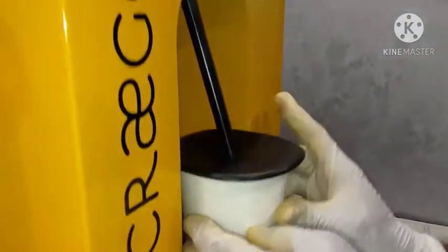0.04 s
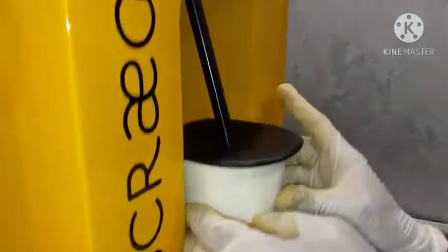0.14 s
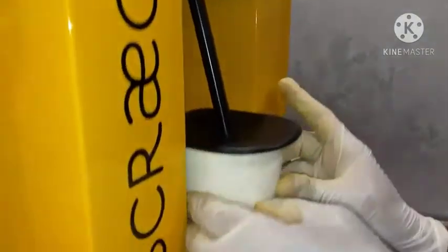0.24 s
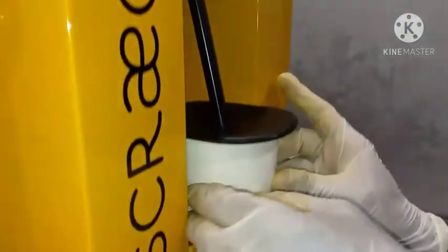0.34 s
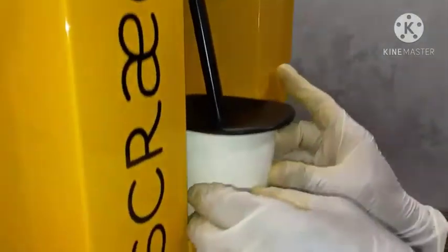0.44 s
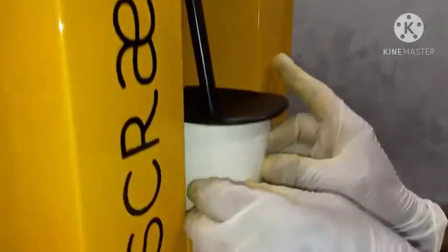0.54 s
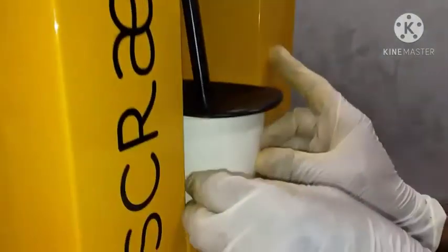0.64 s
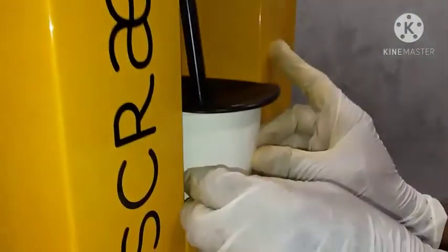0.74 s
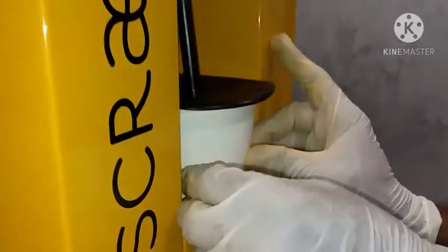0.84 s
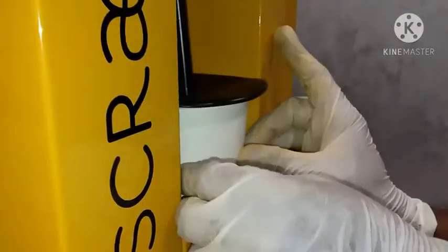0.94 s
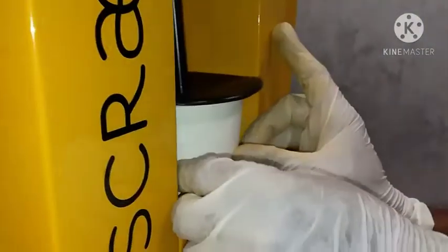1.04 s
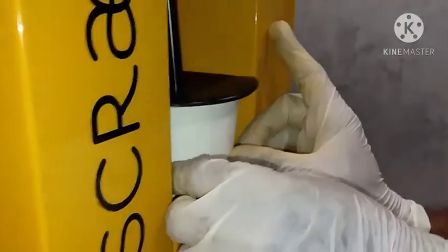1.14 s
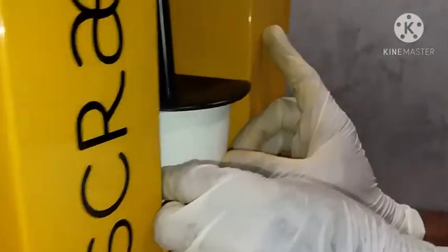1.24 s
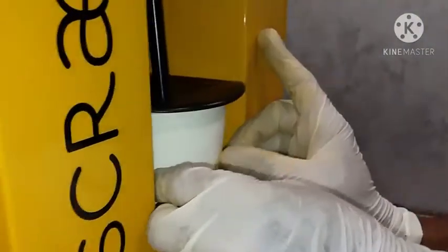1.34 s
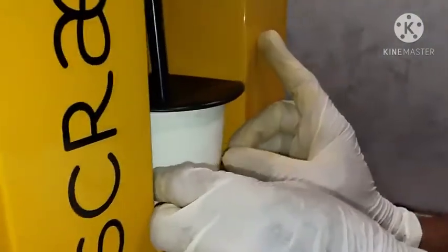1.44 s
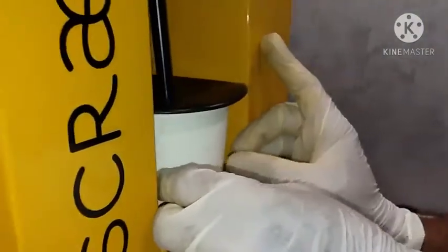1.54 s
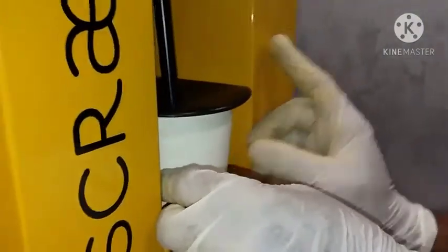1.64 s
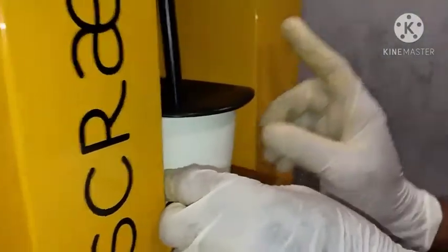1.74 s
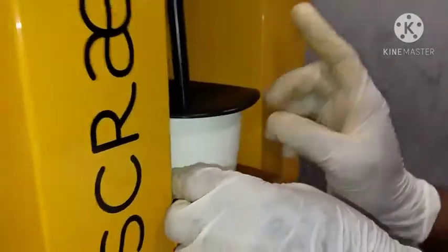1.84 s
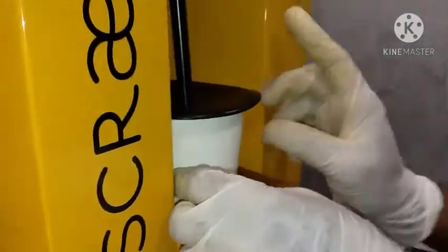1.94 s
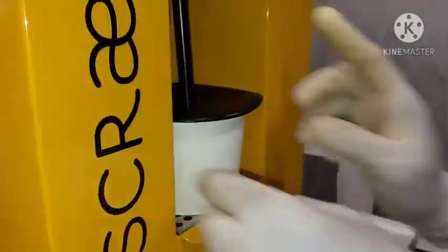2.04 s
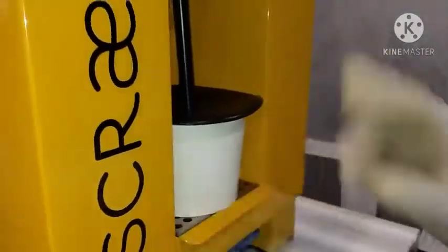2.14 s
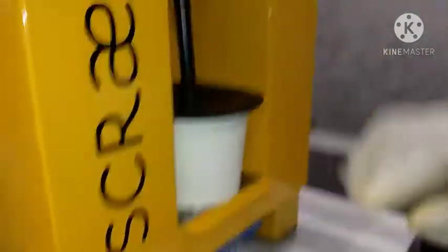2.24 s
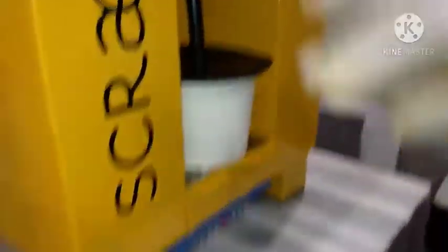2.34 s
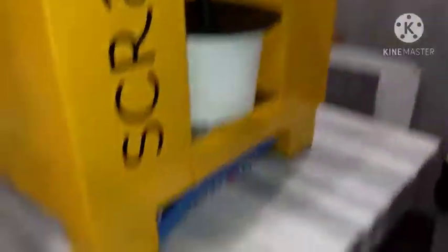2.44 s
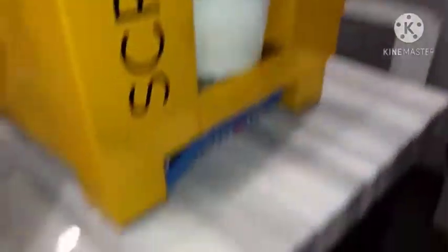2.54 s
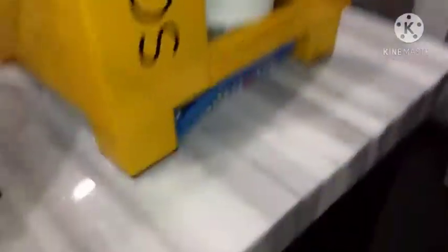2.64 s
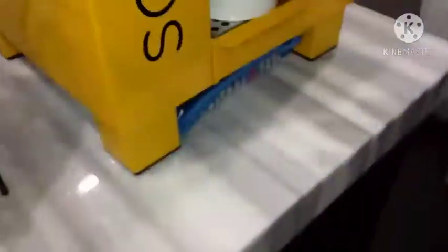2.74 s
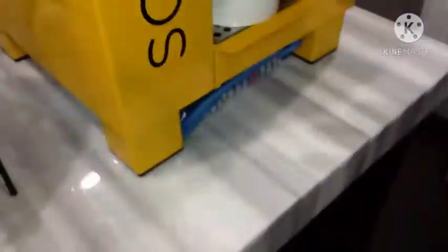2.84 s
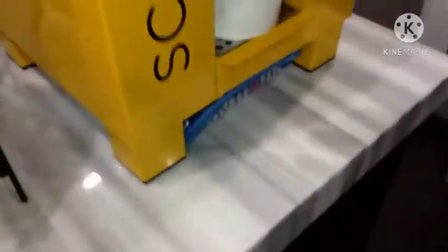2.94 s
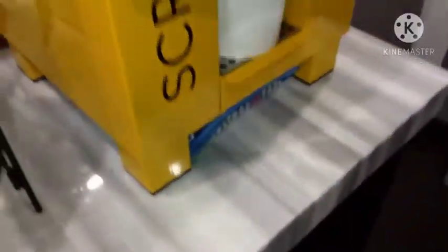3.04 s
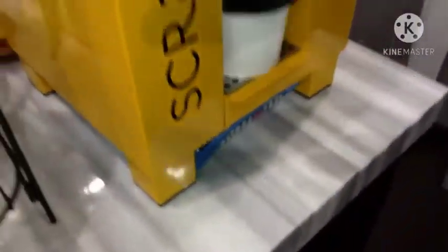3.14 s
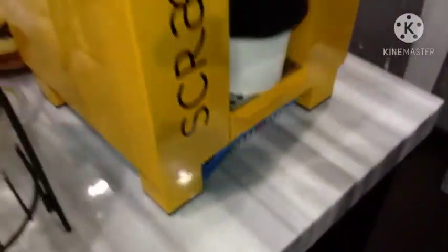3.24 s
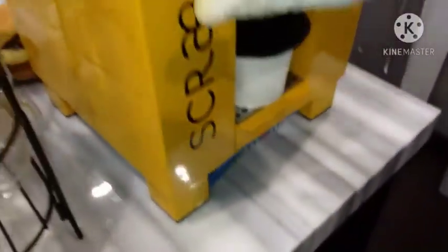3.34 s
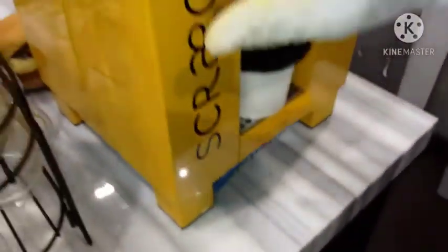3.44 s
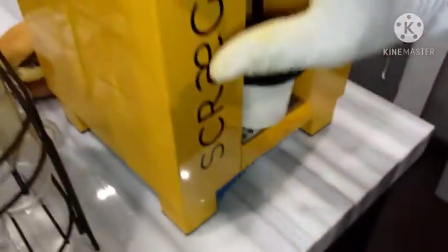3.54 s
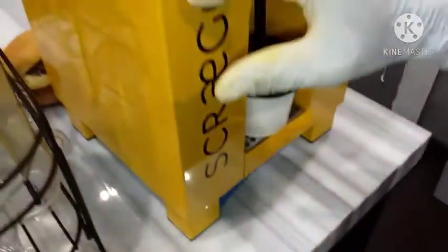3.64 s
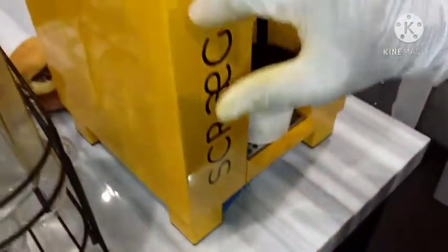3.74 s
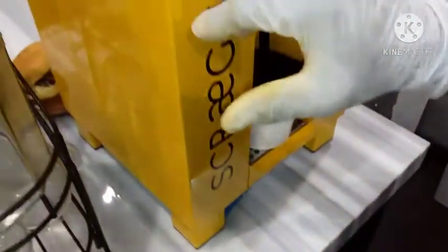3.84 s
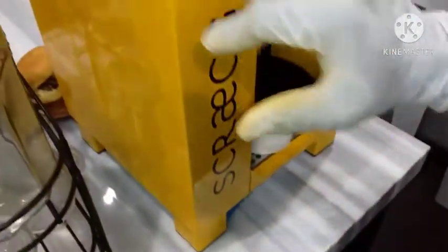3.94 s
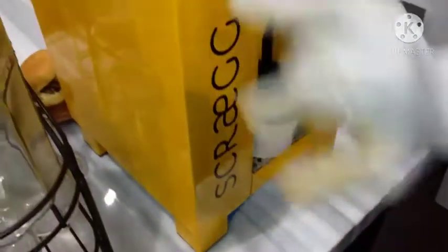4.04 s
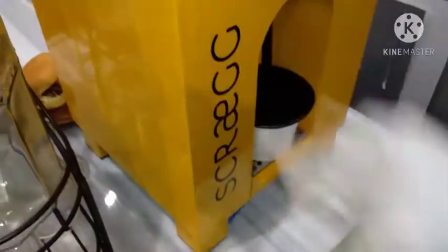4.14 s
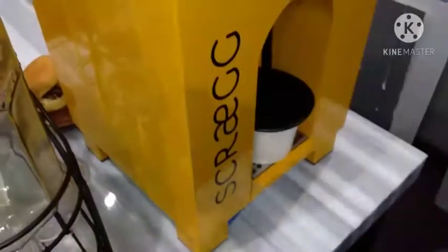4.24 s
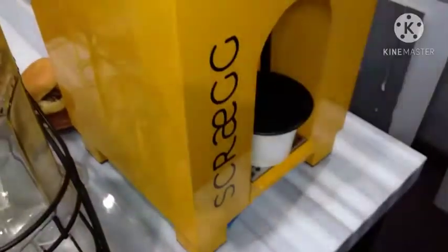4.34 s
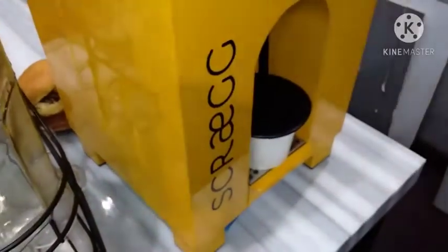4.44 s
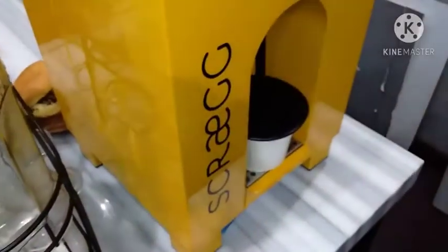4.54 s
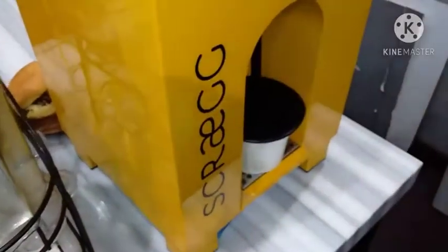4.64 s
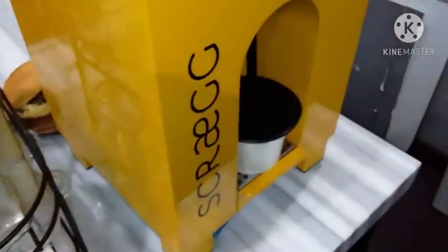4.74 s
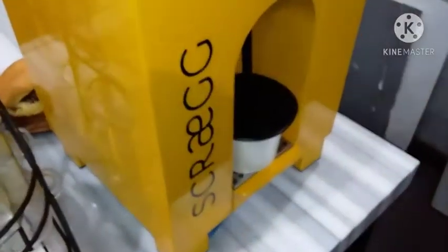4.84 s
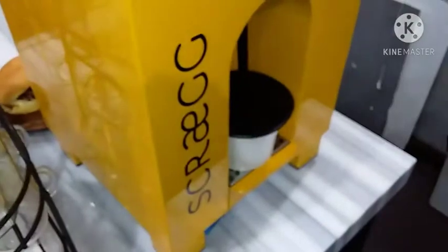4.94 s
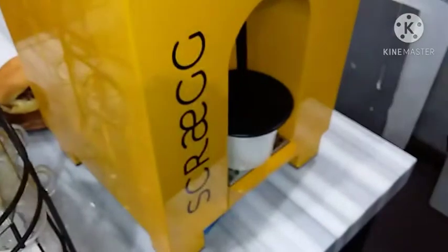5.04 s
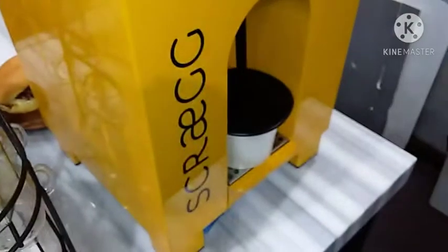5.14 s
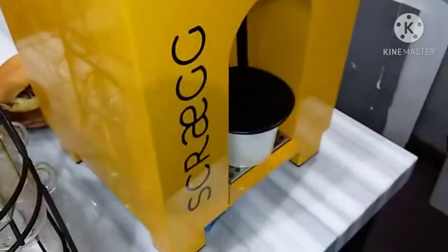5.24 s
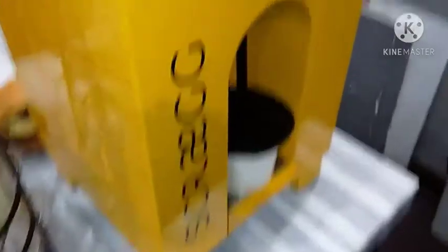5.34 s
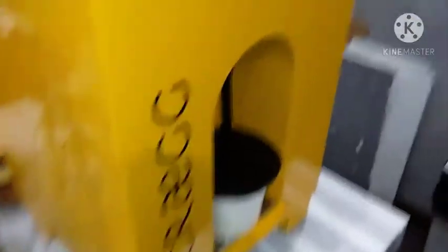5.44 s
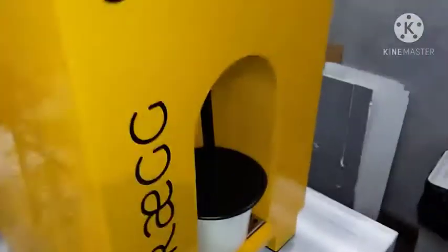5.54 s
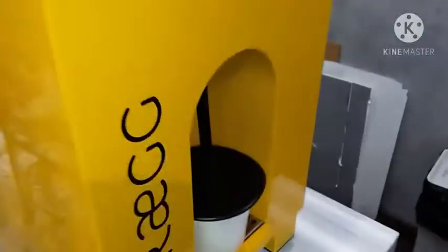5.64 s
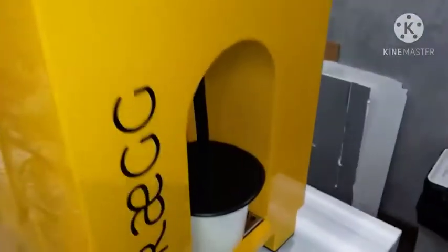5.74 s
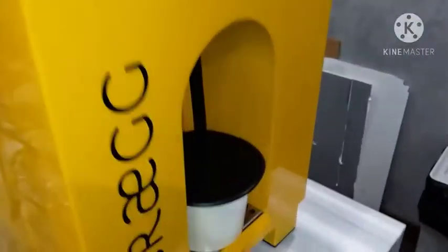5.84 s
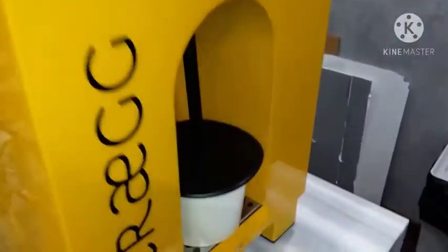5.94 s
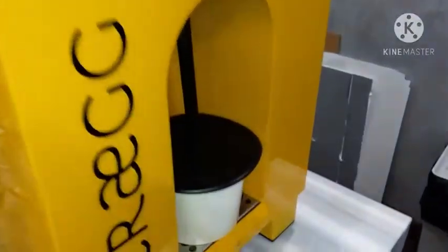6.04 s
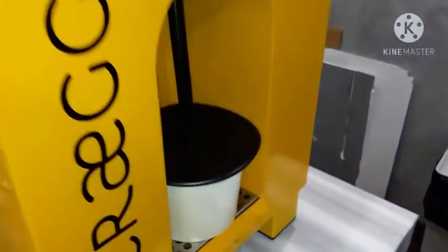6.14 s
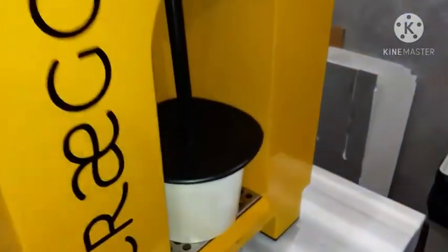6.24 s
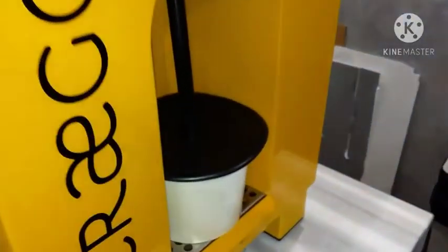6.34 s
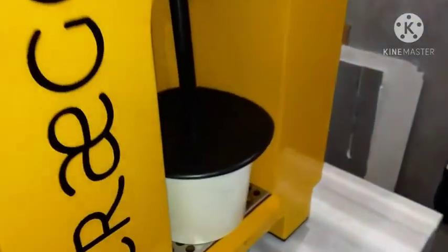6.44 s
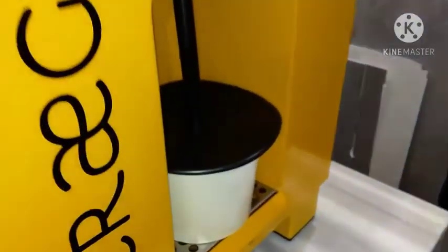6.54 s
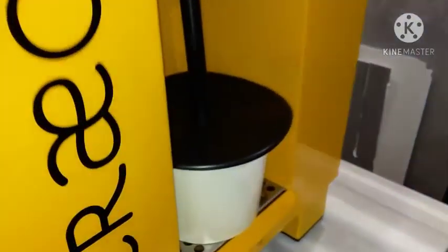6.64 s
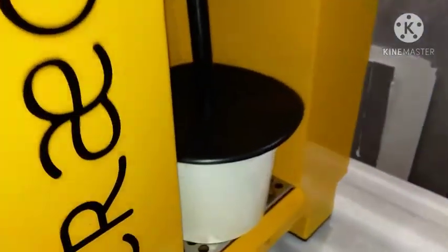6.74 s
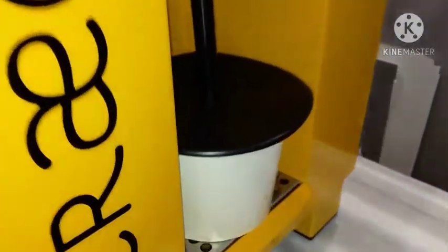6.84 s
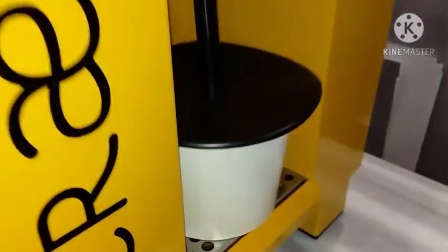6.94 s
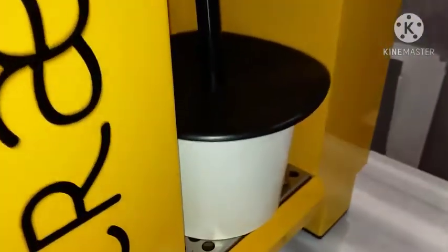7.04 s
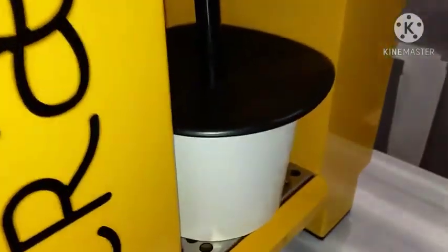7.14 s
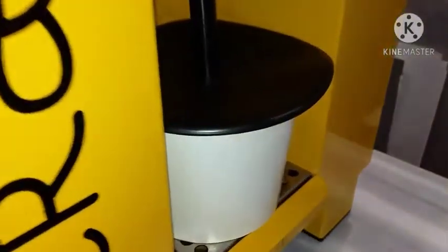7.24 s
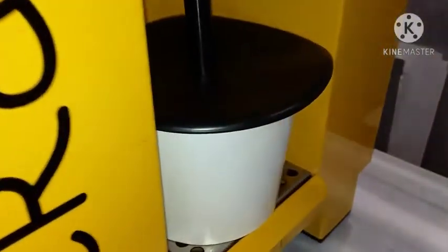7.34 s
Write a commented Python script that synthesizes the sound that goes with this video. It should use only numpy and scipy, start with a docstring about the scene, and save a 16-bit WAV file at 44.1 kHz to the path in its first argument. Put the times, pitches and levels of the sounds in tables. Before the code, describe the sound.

After quiet handling over ventilation hum, a steam jet bursts loudly into a cup, hissing and sputtering, then turning into a thick, deep gurgle.

```python
"""At a food stall, a steam wand cooks egg in a lidded paper cup, heard from close by.
Gloves rub and tick on the machine over a fan's rumble; then the valve spits open and the jet hisses.
Shaped noise makes the hiss, rubbing and rumble. Random clicks are steam bubbles that ring the cup.
As the egg sets it smothers the hiss, and the gurgle deepens."""
import sys
import numpy as np
from scipy import signal
from scipy.fft import rfft, irfft
from scipy.io import wavfile
from scipy.ndimage import uniform_filter1d, map_coordinates

SR = 44100
rng = np.random.default_rng(int(sys.argv[2]) if len(sys.argv) > 2 else 0)


def file_out(sig):
    """Save sig as 16-bit WAV at sys.argv[1]."""
    # one column per channel
    cols = np.atleast_2d(sig).T
    # limit, then scale
    lim = np.clip(cols, -1, 1)
    pcm = np.round(lim * 32767).astype(np.int16)
    wavfile.write(sys.argv[1], SR, pcm)


N = 325458
T = np.arange(N) / SR  # time of every sample [s]
VALVE_S = 3.739  # the steam valve opens


# colours of the gurgle in runny and in set egg: (frequency [Hz], level [dB])
GURGLE_RUNNY = [(60, -42), (220, -40.5), (320, -11), (420, -16.5), (560, -2.5), (690, 1.5), (790, 5.5),
                (900, -10.5), (1050, -22.5), (1600, -42), (3000, -75)]
GURGLE_SET = [(60, -50), (240, -24), (360, -1), (470, -0.5), (600, -1), (700, 0.5), (810, 3.5), (960, -4.5),
              (1130, -23.5), (3000, -41.5)]
# colours of the spatter in runny and in set egg: (frequency [Hz], level [dB])
SPUTTER_RUNNY = [(150, -32), (1130, -3.5), (1600, -1), (2200, 0.5), (2750, -0.5), (3400, 1.5), (4100, -0.5),
                 (5000, -3), (5700, -8), (9000, -13), (15000, -53)]
SPUTTER_SET = [(300, -33), (1150, -9), (1600, -0.5), (2100, 2), (2600, -0.5), (3300, 4.5), (4150, -1),
               (4550, -11.5), (6000, -11.5), (9000, -23), (15000, -41)]
# air and wall resonances of the lidded cup: (frequency [Hz], width [Hz], level [dB])
CUP = [(1113, 210, 1), (1376, 51, 16.5), (1662, 21, 4), (2105, 65, 1.5), (2390, 13, -2), (3146, 49, -7),
       (3335, 58, 0), (3766, 51, -4), (4160, 44, -3)]
# the steam cavity grows, so its ring sinks: (time [s], pitch [Hz])
CAVITY = [(3.8, 675), (4.8, 576), (6.5, 509), (7.0, 468), (7.38, 382)]
# the spatter lets up for a moment: (time [s], dip [dB], half length [s])
LULLS = [(3.875, -6.5, 0.023), (4.92, -4.5, .04), (5.224, -7, 0.016), (6.527, -2.5, 0.028),
         (6.9, -2.5, 0.05)]
DEEPEN_FROM_S, DEEPEN_OVER_S = 5.77, 1.18  # the gurgle deepens once the whole cupful thickens
STIR_S = 0.56  # time for the jet to stir up the egg


def boiling(gurgle_db, sputter_db, setting):
    """Collapsing bubbles thump the egg and spatter the cup, whose resonances ring."""
    clicks, splash = pops(rate=170, spread_db=1.5, length_s=0.0089)
    _, spatter = pops(rate=380, spread_db=3.0, length_s=0.0054)

    # gurgle: the thumps, coloured by the egg and the air under the lid
    steady = undb(gurgle_db - 0.3 + 0.58 * walk(14))
    push = np.hypot(steady, gulps())
    depth = np.clip((T - DEEPEN_FROM_S) / DEEPEN_OVER_S, 0.06, 1)
    body = egg(clicks + undb(-2.5) * splash, GURGLE_RUNNY, GURGLE_SET, depth)
    lid_air = undb(-1) * ring(body, 685, 26) + undb(-9) * ring(body, 787, 30)
    body = unit(body + lid_air)
    cavity_hz = curves(CAVITY)[0] * (1 + 0.053 * walk(25))
    cavity = sliding_ring(splash, cavity_hz, width_hz=80)
    gurgle = body + undb(-8.0 + 3 * setting) * cavity
    # bubbles of many sizes keep shifting the strongest note
    gurgle = churn(gurgle, patch_hz=130.0, patch_s=0.025, depth_db=2, size=512)

    # sputter: firm egg crackles more and damps the cup
    spray = splash + undb(-1.5 + 2.94 * setting) * spatter
    spray = egg(spray, SPUTTER_RUNNY, SPUTTER_SET, setting)
    cup = sum(undb(db) * ring(spray, hz, width) for hz, width, db in CUP)
    cup = cup * undb(-2.0 - 2.6 * setting ** 4)
    sputter = unit(churn(spray, patch_hz=350.4, patch_s=0.03, depth_db=4) + cup)
    # spatter grows only as the egg is stirred up
    stirred = 1 - burst(VALVE_S, STIR_S)
    spurts = [(s, db, half) for s, db, _, half in SPURTS]
    throw = swelled(sputter_db - 0.4 + 1.4 * walk(22), spurts)
    lull = undb(sum(db * bump(s, half) for s, db, half in LULLS))
    return push * gurgle + stirred * lull * throw * sputter


# big bubbles bursting: (time [s], level [dB], length [s])
GULPS = [(3.823, -22, 0.049), (3.963, -21, 0.01), (4.025, -21, 0.063), (4.204, -18, 0.013),
         (4.229, -20, .02), (4.331, -19, 0.029), (4.664, -16, 0.01), (4.768, -24.5, 0.018),
         (4.908, -21, .025), (4.983, -20, 0.029), (5.248, -18.5, 0.0051), (5.538, -21.5, .012),
         (5.845, -25.5, 0.025), (6.264, -26.5, .03), (6.892, -22, .012)]
GULP_ATTACK_S, GULP_RELEASE_S = 0.0023, 0.0044


def gulps():
    """Gain of the big bursts: each jumps up, holds and dies away."""
    gain = 0
    for s, db, length in GULPS:
        attack = np.clip((T - s) / GULP_ATTACK_S + 0.5, 0, 1)
        release = np.exp(-np.maximum(T - s - length, 0) / GULP_RELEASE_S)
        gain = gain + undb(db) * attack * release
    return gain


# colours of the hiss in runny and in set egg: (frequency [Hz], level [dB])
HISS_RUNNY = [(1500, -48), (4000, -5), (5500, -0.5), (7400, 1.5), (9500, 0), (11800, 4.5), (14000, 2.5),
              (15500, 0)]
HISS_SET = [(1500, -26), (4000, 4), (5500, 1), (7000, -6), (8000, 3), (9500, -6), (11800, -1),
            (14000, -7.5), (15500, -9)]
# narrow, evenly spaced peaks in the hiss: (frequency [Hz], width [Hz], level [dB])
HISS_PEAKS = [(7340, 320, -5), (9120, 220, -1.5), (10350, 180, -0.5), (11700, 180, -8), (13200, 97, 0),
              (14500, 250, -1), (15420, 200, -11)]
# egg covers the nozzle and chokes the hiss: (time [s], dip [dB], half length [s])
CHOKES = [(4.447, -9, 0.016), (4.596, -5, 0.0079), (5.115, -6.5, 0.033), (5.323, -7.5, 0.021),
          (5.433, -6.5, 0.024), (5.565, -4.5, .015), (5.789, -9, 0.031), (5.977, -9, 0.018),
          (6.101, -16, 0.02), (6.397, -6.5, 0.039), (6.64, -5, 0.055)]
# the jet breaks through and throws a spurt of spray, heard in the boiling too:
# (time [s], sputter level [dB], hiss level [dB], half length [s])
SPURTS = [(3.818, -26, -36, 0.022), (4.201, -27, -22, .012), (4.442, -27, -45, 0.057),
          (4.795, -29, -35, 0.0097), (4.996, -29, -28, 0.015), (5.255, -26, -31, .008),
          (5.385, -38, -24.5, .018), (5.63, -44, -26, 0.011), (5.853, -24.5, -26.5, 0.014),
          (6.47, -38, -37, .012), (6.317, -29.5, -46, 0.02), (6.719, -23, -35.5, 0.043),
          (7.121, -24, -40, 0.056)]


def jet(hiss_db, setting):
    """The nozzle hisses and fizzes, chokes and spurts; the churning surface keeps changing its colour."""
    _, fizz = pops(rate=800, spread_db=10.5, length_s=0.0067)
    hiss = egg(noise() + undb(-3.0) * fizz, HISS_RUNNY, HISS_SET, setting)
    hiss = hiss + sum(undb(db) * ring(hiss, hz, width) for hz, width, db in HISS_PEAKS)
    hiss = churn(hiss, patch_hz=277, patch_s=0.089, depth_db=1.6)  # slow heaving of the surface
    hiss = churn(hiss, patch_hz=465, patch_s=0.013, depth_db=3.0)  # quick flecks of spray
    choke_db = sum(db * bump(s, half) for s, db, half in CHOKES)
    spurts = [(s, db, half) for s, _, db, half in SPURTS]
    force = swelled(hiss_db + 1.0 + choke_db, spurts)
    # thicker egg makes the jet stutter more
    stutter_db = 1.7 * setting + (0.4 + 1.1 * setting) * walk(45)
    return hiss * force * undb(stutter_db)


# steam pockets whistle through gaps in the egg:
# (time [s], level before the trim [dB], middle pitch [Hz], half length [s])
POCKETS = [(3.82, -35.5, 2360, .018), (3.928, -29.5, 2420, .01), (4, -24, 1380, 0.018),
           (4.013, -29, 1030, .03), (4.14, -28, 1135, 0.024), (4.169, -21.5, 1375, .014),
           (4.19, -27.5, 3960, .03), (4.213, -21, 1395, .007), (4.305, -22.5, 1380, 0.0073),
           (4.422, -26, 3280, 0.027), (4.463, -27.5, 2300, .015), (4.798, -19, 1386, 0.0056),
           (4.987, -27.5, 1950, 0.0081), (5.434, -30.5, 2100, .018), (6.271, -22.5, 1367, 0.0086),
           (6.292, -30, 3370, 0.064), (6.686, -26, 1400, .012), (6.698, -21, 3300, 0.012)]


def pockets(width_share=0.088, trim_db=-1.5, waver=0.029):
    """Steam rushes through a gap in the egg; its resonance wavers as the gap shrinks and grows."""
    out, rush = np.zeros(N), noise()
    gap = 1 + waver * walk(30)
    for s, db, hz, half in POCKETS:
        near = abs(T - s) < 3 * half
        swell = undb(db + trim_db) * np.exp(-((T[near] - s) / half) ** 2 / 2)
        out[near] += swell * sliding_ring(rush[near], hz * gap[near], width_share * hz)
    return out


# colour of the spitting water: (frequency [Hz], level [dB])
SPIT_COLOUR = [(150, -5), (330, 10.5), (800, 2), (2000, -12), (3200, -1.0), (4500, 6.5),
               (5600, -14), (7000, -5), (8400, 10.5), (11000, 0.5), (15500, -1.5)]


def valve():
    """Condensed water spits from the wand as the valve opens: a dying burst of coloured noise."""
    return undb(-15.5) * colour(noise() * burst(VALVE_S, 0.17), SPIT_COLOUR)


# fingers ticking on the housing:
# (time [s], level before colour and ringing [dB], time to fade by 60 dB [s])
TICKS = [(1.668, -52, .02), (1.9176, -29.5, .03), (1.924, -42, 0.039), (1.990, -34, 0.0073),
         (2.321, -49, .012)]
# colour of the ticks: (frequency [Hz], level [dB])
TICK_COLOUR = [(500, -9), (1500, -15), (2800, -1.5), (5000, -4), (7500, -0.5), (9500, -8), (15000, -20)]
# resonances of the plastic, before a shared boost: (frequency [Hz], width [Hz], level [dB])
HOUSING = [(1620, 43, 7), (2420, 24, -2), (5200, 45, -6), (6370, 85, -15)]
# a glove sliding on cup and housing:
# (time of the peak [s], level [dB], rise [s], fall [s], tilt [dB per octave])
RUBS = [(.62, -57.5, 0.24, 0.19, 0.5), (.99, -60, 0.12, 0.13, 2), (1.19, -38, 0.037, 0.072, -2),
        (2.365, -45, 0.02, 0.015, 4), (2.36, -59, 0.13, 0.19, 2), (2.79, -58, 0.14, 0.17, -1.5)]
# colour of the rubs: (frequency [Hz], level [dB])
RUB_COLOUR = [(700, -17), (1700, -2), (3300, 3.5), (5000, -1.5), (8000, -7), (12000, -10), (15500, -15)]
# rubber squeaks thinly in every stroke, relative to its level but never above the maximum
SQUEAK_HZ, SQUEAK_WIDTH_HZ, SQUEAK_DB, SQUEAK_MAX_DB = 5980, 450, -2.5, -65


def hands():
    """Rubber gloves slide and squeak as noise, and finger ticks ring the plastic."""
    taps = noise() * sum(undb(db) * burst(s, t60) for s, db, t60 in TICKS)
    taps = undb(-0.5) * colour(taps, TICK_COLOUR)
    housing = sum(undb(db) * ring(taps, hz, width) for hz, width, db in HOUSING)
    out = taps + undb(8.5) * housing
    squeak = 0
    for s, db, rise, fall, tilt_db in RUBS:
        stroke = np.exp(-(np.minimum(T - s, 0) / rise) ** 2 - np.maximum(T - s, 0) / fall)
        out = out + undb(db) * stroke * colour(noise(), RUB_COLOUR, tilt_db)
        squeak_db = min(db + SQUEAK_DB, SQUEAK_MAX_DB)
        squeak = np.maximum(squeak, stroke * undb(squeak_db))
    return out + squeak * unit(ring(noise(), SQUEAK_HZ, SQUEAK_WIDTH_HZ))


# colour of the ventilation: (frequency [Hz], level [dB per Hz])
STALL = [(28, -54), (55, -4), (80, -5), (100, 0.5), (140, -1.5), (200, 0), (270, -2.5), (390, -11),
         (600, -12.5), (700, -9.5), (860, -14), (1150, -15), (1600, -19.5), (4200, -29.5), (6200, -38.5),
         (8400, -41.5), (9200, -47), (15000, -52)]
STALL_DB = -41.5  # middle level of the air noise


def stall():
    """Ventilation rumbles with a broad duct resonance and a mains hum."""
    duct = unit(ring(ring(noise(), 270, 120), 270, 120))
    air = unit(colour(noise(), STALL)) + undb(-6.0) * duct
    hum = undb(-55.5 + 2 * walk(3.6)) * np.sin(2 * np.pi * 100 * T)
    return unit(air) * undb(STALL_DB + 0.5 * walk(18)) + hum


def room(x, t60=0.32, wet_db=-11):
    """Counter and near walls add a short tail of fading noise."""
    tail = noise() * burst(0.0022, t60)
    tail = tail / np.linalg.norm(tail)
    return x + undb(wet_db) * signal.fftconvolve(x, tail)[:N]


def pops(rate, spread_db, length_s):
    """Collapses of uneven size and spacing: their clicks and the short splashes after them, each rms 1."""
    chance = rng.random((int(rate * (N - 1) / SR), 2))
    # one click at a random moment in each equal slot of time
    when = (np.arange(len(chance)) + chance[:, 0]) * SR / rate
    size = np.minimum(-np.log(chance[:, 1]), 4)  # mostly small, a few big
    clicks = np.zeros(N)
    clicks[when.astype(int)] = undb(spread_db * size)
    power = signal.lfilter([1], [1, -np.exp(-2 / (length_s * SR))], clicks ** 2)
    splash = np.sqrt(power) * noise()
    return unit(clicks - clicks.mean()), unit(splash)


def egg(x, runny, firm, setting):
    """The colour passes from runny to set egg."""
    return np.sqrt(1 - setting) * unit(colour(x, runny)) + np.sqrt(setting) * unit(colour(x, firm))


def churn(x, patch_hz, patch_s, depth_db, size=256):
    """Patches of the spectrum swell and sink on their own."""
    hz, s, frames = signal.stft(x, SR, nperseg=size)
    place = np.meshgrid(hz / patch_hz, s / patch_s, indexing="ij")
    # smooth between random levels on a grid of pitch and time
    swell = map_coordinates(rng.standard_normal((128, 512)), place, order=1, mode="wrap")
    return unit(signal.istft(frames * undb(depth_db * swell), SR)[1][:N])


def ring(x, hz, width_hz):
    """One resonance, gain 1 at its centre."""
    return signal.lfilter(*signal.iirpeak(hz, hz / width_hz, fs=SR), x)


def sliding_ring(x, hz, width_hz):
    """A resonance whose centre moves along hz; rms 1."""
    # shift the moving centre down to 0 Hz, keep what is near it, shift it back
    turn = np.exp(2j * np.pi * np.cumsum(hz) / SR)
    lowpass = signal.butter(2, width_hz / 2, fs=SR, output="sos")
    return unit(np.real(turn * signal.sosfilt(lowpass, x / turn)))


def colour(x, points, tilt_db=0, size=4096):
    """Causal filter of unit power through (Hz, dB) points, tilted per octave."""
    hz, db = np.transpose(points)
    octave = np.log2(np.maximum(np.fft.rfftfreq(size, 1 / SR), 1))
    level_db = np.interp(octave, np.log2(hz), db) + tilt_db * octave
    # folding the cepstrum makes the filter respond as early as it can
    cepstrum = irfft(np.log(undb(level_db)))
    cepstrum[1:size // 2] *= 2
    cepstrum[size // 2 + 1:] = 0
    response = irfft(np.exp(rfft(cepstrum)))
    return signal.fftconvolve(x, response / np.linalg.norm(response))[:N]


def burst(s, t60):
    """Envelope that jumps up at s and fades by 60 dB in t60 seconds."""
    return (T >= s) * np.exp(-np.log(1000) * np.maximum(T - s, 0) / t60)


def bump(s, half_s):
    """Smooth swell that peaks at s."""
    return np.exp(-((T - s) / half_s) ** 2)


def swelled(steady_db, swells):
    """Gain of a steady level with (s, dB, half length s) swells added in power."""
    extra = sum((undb(db) * bump(s, half)) ** 2 for s, db, half in swells)
    return np.sqrt(undb(steady_db) ** 2 + extra)


def walk(rate):
    """Random levels, rate of them a second, smoothed into slides; rms 1."""
    k = int(SR / rate)
    steps = rng.standard_normal(N // 40)[(T * rate).astype(int)]
    return unit(uniform_filter1d(uniform_filter1d(steps, k), k // 2))


def noise():
    """White noise of rms 1."""
    return rng.standard_normal(N)


def curves(table):
    """Each column of a table, joined by straight lines in time."""
    s, *columns = np.transpose(table)
    return [np.interp(T, s, c) for c in columns]


def undb(db):
    """Decibels to gain."""
    return 10 ** (np.asarray(db) / 20)


def unit(x):
    """Scale to rms 1."""
    return x / np.sqrt(np.mean(x ** 2))


# steady strength of the boil and the jet, before small trims:
# (time [s], gurgle level [dB], sputter level [dB], hiss level [dB])
STEAM = [(3.78, -36.5, -35.0, -28), (3.98, -23.5, -27.0, -25.5), (4.25, -25.5, -28.5, -24),
         (4.9, -25.5, -28, -26), (5.35, -27.5, -30, -29.5), (5.8, -27.5, -30.0, -28.5),
         (6.08, -29.5, -32, -33), (6.4, -25.5, -27.5, -37.5), (7.05, -22, -25.5, -42.0),
         (7.38, -19.5, -26.5, -50)]
# how far the egg has set: (time [s], share [0-1])
SETTING = [(3.74, 0.14), (5.2, 0.04), (6.0, 0.22), (6.5, 0.94), (7.38, 1)]


def scene():
    """Everything is heard from one point, alike in both ears."""
    gurgle_db, sputter_db, hiss_db = curves(STEAM)
    setting = np.clip(curves(SETTING)[0], 0, 1)
    flow = (T >= VALVE_S) - burst(VALVE_S, 0.11)  # steam builds up after the valve opens
    steam = boiling(gurgle_db, sputter_db, setting) + pockets() + jet(hiss_db, setting)
    mono = room(flow * steam + valve() + hands()) + stall()
    return np.array([mono, mono])


START_S, TOP_HZ = 0.5475, 15600  # silence before this time; highest pitch let through


def record(dry):
    """The sound is switched on after a silent moment; a steep filter cuts the top."""
    lowpass = signal.ellip(12, 0.1, 80, TOP_HZ, fs=SR, output="sos")
    return signal.sosfilt(lowpass, dry * (T >= START_S))


dry = scene()
out = record(dry)
file_out(out)
```